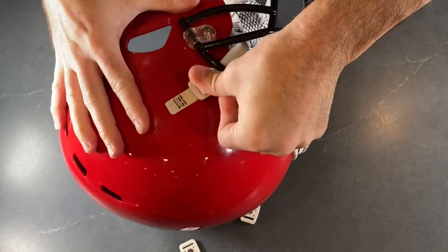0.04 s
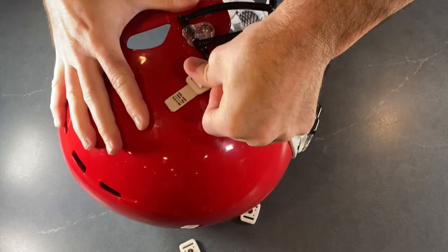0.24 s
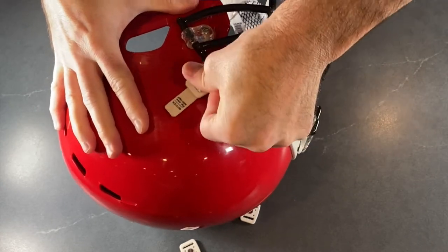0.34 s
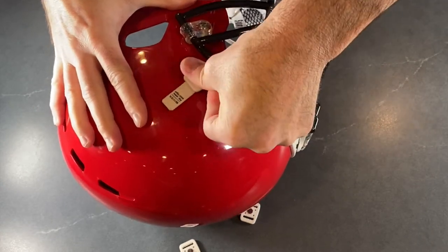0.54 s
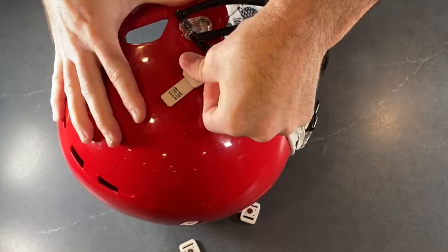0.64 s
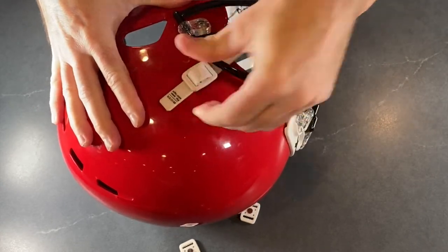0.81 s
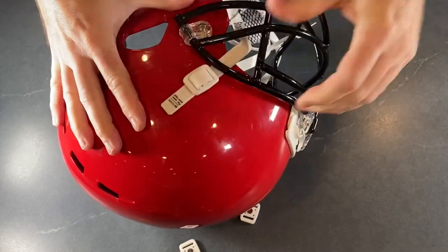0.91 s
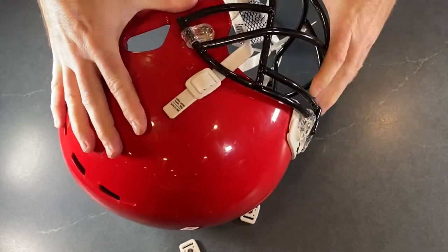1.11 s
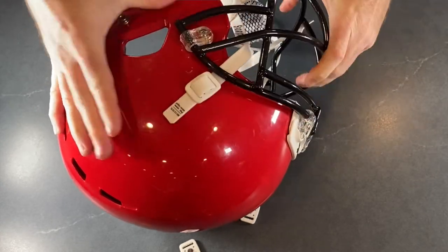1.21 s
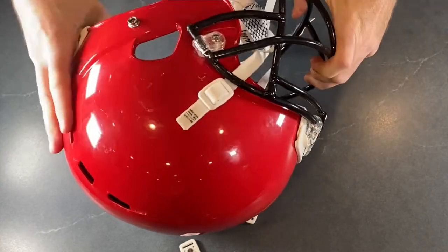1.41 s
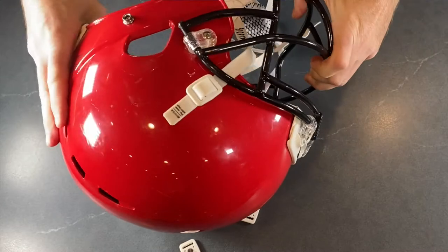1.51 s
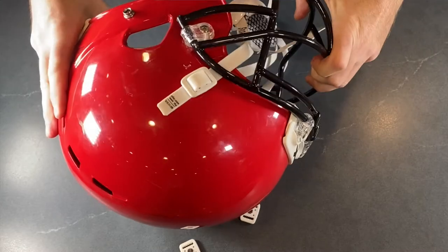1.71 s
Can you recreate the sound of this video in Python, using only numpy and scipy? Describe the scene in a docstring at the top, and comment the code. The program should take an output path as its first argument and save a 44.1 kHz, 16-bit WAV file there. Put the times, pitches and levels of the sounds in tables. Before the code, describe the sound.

A plastic chinstrap buckle snaps sharply onto a helmet, close by in a quiet room. The strap ticks faintly as it is let go, then the helmet knocks softly on a table as it is turned.

```python
"""Snapping a helmet's chinstrap shut

Fingers press a plastic buckle onto its post: a small click, then one sharp snap that rings the helmet's shell
and the room. The strap ticks before and after the snap, skin slides over the glossy shell with a thin gliding
hiss, and the helmet knocks softly on the table as it is turned. A low room rumble lies underneath."""
import sys
import numpy as np
from scipy import signal
from scipy.fft import rfft, irfft
from scipy.io import wavfile

SR = 44100
rng = np.random.default_rng(int(sys.argv[2]) if len(sys.argv) > 2 else 0)


def store_pcm(level_fs):
    """Save levels as 16-bit WAV."""
    pcm = np.round(np.clip(level_fs, -1, 1) * 32767).astype(np.int16)
    wavfile.write(sys.argv[1], SR, np.atleast_2d(pcm).T)


N = 77175
TIME = np.arange(N) / SR

# The buckle's hits, each a rounded push plus a hard click:
# t/s, push level/dB, push centre f/Hz, push width/octaves, click level/dB
SNAP_HITS = [(0.1803, -24, 1000, 2.5, -28.5), (0.1821, -24.5, 1000, 3.5, -33.5),
             (0.1854, -28.5, 1750, 0.87, -39.5), (0.2219, -2.5, 815, 1.81, -1), (0.224, 0, 1020, 0.8, -13),
             (0.2257, 2.47, 1650, 0.35, -13)]
# Tones the shell rings with: f/Hz, level/dB, ring time/s (the time to fade by 60 dB)
SHELL_TONES = [(165.8, -33.5, 0.3), (438.2, -28, 0.09), (626, -41.5, .051), (718, -31, .058),
               (781, -33.5, .045), (853, -36.5, 0.049), (995, -25.5, 0.046), (1073, -26.5, 0.034),
               (1339, -31, 0.022), (1682, -19.5, .017), (1878, -16.5, 0.019), (2256, -36, 0.038),
               (2465, -26.5, 0.027)]
# Tones of the post and its socket: f/Hz, level/dB, ring time/s
POST_TONES = [(4490, -32.5, 0.013), (5070, -30, 0.0036), (5460, -31, 0.015), (8480, -32.5, 0.015),
              (10420, -30, .008), (12400, -34.5, 0.01)]
# Colour (loudness from bass to treble) of the post's crowd of weaker tones: f/Hz, level/dB
POST_COLOUR = [(800, -18), (3200, -19), (5000, 4.5), (6500, -10.5), (8200, -1), (9400, -8.5), (12000, 0),
               (15000, -23)]
def buckle_snap():
    """The buckle catches, jumps over the post and seats, ringing both post and shell."""
    return contacts(SNAP_HITS, SHELL_TONES, POST_TONES, POST_COLOUR, crowd_db=-28.5, spread_db=0)


# Strap and buckle ticks: t/s, push level/dB, push centre f/Hz, push width/octaves, click level/dB
TICK_HITS = [(0.002, -23.5, 1620, 2.3, -27), (0.02, -25.5, 1350, 0.53, -61), (0.029, -26.5, 425, 0.79, -57),
             (0.052, -33, 1410, 0.76, -60), (0.067, -31, 1310, 0.45, -60), (0.0972, -49.5, 1900, 1, -49),
             (0.148, -42.5, 1794, .8, -56.5), (0.534, -43, 1860, 2.53, -37), (0.5549, -35, 1105, 1.1, -54),
             (0.571, -31.5, 431, 0.64, -52), (0.573, -28, 1685, 0.46, -48),
             (0.5794, -32.5, 1790, 0.56, -39), (0.677, -37.5, 430, 1.5, -53), (0.748, -38.5, 993, 2.2, -46),
             (0.792, -29.5, 440, 1.1, -52), (0.8229, -21.5, 1243, 0.32, -47.5)]
def strap_ticks():
    """The strap scuffs rather than strikes, so each push takes a moment to swell."""
    return contacts(TICK_HITS, SHELL_TONES, POST_TONES, POST_COLOUR, rise_s=.002)


# Knocks on the table: t/s, push level/dB, push centre f/Hz, push width/octaves, click level/dB
KNOCK_HITS = [(1.198, -17, 514, 1.3, -35.5), (1.206, -29.5, 920, 1.9, -52), (1.2681, -29, 2030, 3.5, -43),
              (1.321, -30.5, 410, 1.3, -51), (1.347, -37, 1800, 2.6, -40.5), (1.437, -28, 1380, 0.33, -52),
              (1.484, -15, 930, 0.64, -33.5), (1.514, -30.5, 1323, 1.8, -51),
              (1.541, -34.5, 1240, 0.99, -49), (1.61, -29, 343, .8, -59), (1.613, -33, 2200, 1.03, -41.5)]
# Tones of the helmet and face guard against the table: f/Hz, level/dB, ring time/s
GUARD_TONES = [(306, -38.5, 0.36), (418.3, -25.5, 0.087), (460, -35.5, 0.14), (940, -22.5, 0.015),
               (1179, -32, 0.044), (1812, -25.5, 0.023), (2193, -27, 0.037), (3000, -41.5, 0.033)]
# High tones that give the knocks a hard edge: f/Hz, level/dB, ring time/s
EDGE_TONES = [(2990, -21.5, 0.015), (3390, -29, 0.013), (4280, -26, 0.012), (7170, -26.5, .011)]
# Colour of the weaker tones in that edge: f/Hz, level/dB
EDGE_COLOUR = [(800, -26), (3000, 5), (4600, -4), (5700, -3), (7500, -2), (12000, -8), (15000, -20)]
def table_knocks():
    """The helmet and its face guard bump the table as they are turned."""
    return contacts(KNOCK_HITS, GUARD_TONES, EDGE_TONES, EDGE_COLOUR)


# Colour of the weak tones between the shell's main ones: f/Hz, level/dB
SHELL_COLOUR = [(150, -8.5), (250, -9.5), (400, -3.5), (950, 0), (1900, -2), (2800, -11.5), (5000, -31),
                (15000, -65.5)]
def contacts(hits, push_tones, click_tones, click_colour, crowd_db=-21, spread_db=3.5, rise_s=1 / SR):
    """Each hit gives the helmet a rounded push and its fittings a hard click."""
    # The defaults suit light hits, which land anywhere: more of the weak tones, and uneven main ones.
    out = np.zeros(2 * N)
    for start_s, push_db, centre_hz, octaves, click_db in hits:
        edge_ratio = 2 ** (max(octaves, .1) / 2)
        edges_hz = [centre_hz / edge_ratio, min(centre_hz * edge_ratio, SR / 3)]
        band = signal.butter(1, edges_hz, "band", fs=SR, output="sos")
        ring = struck_part(push_tones, spread_db, SHELL_COLOUR, crowd_db, crowd_fade_s=.04)
        swell = 1 - np.exp(-TIME[:len(ring)] / rise_s)
        push = signal.sosfilt(band, ring) * swell
        click = struck_part(click_tones, spread_db, click_colour, crowd_db=-28.5, crowd_fade_s=.024)
        start = int(start_s * SR)
        out[start:start + len(push)] += from_db(push_db) * push + from_db(click_db) * click
    return out[:N]


def struck_part(tones, spread_db, crowd_colour, crowd_db, crowd_fade_s, size=16384):
    """A struck part rings with its main tones and a fast-dying crowd of weak ones, new for every hit."""
    ring = np.zeros(size)
    for hz, db, ring_s in tones:
        strength = from_db(db + spread_db * rng.standard_normal())
        ring += strength * decay(ring_s, size) * np.sin(2 * np.pi * hz * TIME[:size])
    return ring + from_db(crowd_db) * weak_tones(crowd_colour, crowd_fade_s, size)


def weak_tones(colour, fade_s, size):
    """Many weak tones blur into one short burst with no gaps between their pitches."""
    envelope = decay(fade_s, size)
    phases = np.angle(rfft(envelope * rng.standard_normal(size)))
    even = irfft(np.exp(1j * phases), size)  # every frequency equally strong
    burst = tint(even, colour) * decay(4 * fade_s, size)  # a slower second fade quiets the tail
    return burst * np.linalg.norm(envelope) / np.linalg.norm(burst)


# Path of the sliding skin's whistle: t/s, f/Hz, level/dB
SLIDE_PATH = [(0.34, 8200, -99), (0.375, 9450, -81), (0.41, 11520, -69.5), (0.47, 9900, -81.5),
              (0.53, 7850, -98), (0.62, 7450, -105), (0.69, 8300, -89), (0.735, 7060, -90.5),
              (0.79, 9200, -85.5), (0.845, 10850, -77.5), (0.9, 8130, -91.5), (0.99, 10100, -82.5),
              (1.075, 14150, -78), (1.125, 10380, -81.5), (1.18, 12600, -78.5), (1.3, 13200, -82.5),
              (1.5, 13400, -94)]
def skin_slide():
    """Skin on the glossy shell makes a thin, hissy whistle whose pitch follows the sliding speed."""
    hz, level_db = in_time(SLIDE_PATH)
    whistle = gliding_band(hz, width_hz=460)
    hiss = gliding_band(hz + 270, width_hz=950)  # wider, and just above the whistle
    return from_db(level_db) * (whistle + from_db(-4) * hiss)


def gliding_band(hz, width_hz):
    """A narrow band of noise whose centre follows a pitch curve."""
    smoothing = signal.butter(2, width_hz / 2, fs=SR, output="sos")
    wander = signal.sosfilt(smoothing, rng.standard_normal((2, N)))
    phase = 2 * np.pi * np.cumsum(hz) / SR
    return (wander[0] * np.cos(phase) + wander[1] * np.sin(phase)) / wander.std()


# Loudness of the brushing: t/s, level/dB
BRUSH_LEVELS = [(0, -101.5), (0.6, -90.5), (0.8, -82.5), (1.0, -82), (1.07, -73), (1.13, -79), (1.3, -73.5),
                (1.52, -67.5), (1.75, -75.5)]
# Its colour: f/Hz, level/dB
BRUSH_HISS = [(1500, 4), (4000, -5), (5600, -8), (7200, 3), (9200, -2.5), (11500, -2), (13500, -2),
              (15000, -11.5)]
def hand_brush():
    """Hands brush the helmet with a broad hiss."""
    return from_db(in_time(BRUSH_LEVELS)[0]) * noise(BRUSH_HISS)


# Loudness of the rubbing: t/s, level/dB
RUB_LEVELS = [(0.62, -100), (0.71, -78.5), (0.9, -73.5), (1.0, -74.5), (1.08, -101.5), (1.75, -92)]
# Its colour: f/Hz, level/dB
RUB_HISS = [(1000, -17), (1900, 4), (2350, 4.5), (3300, -4.5), (4200, -16), (11500, -30), (12100, -3),
            (12700, -26.5)]
def finger_rub():
    """Fingers leave the strap with a duller rub."""
    return from_db(in_time(RUB_LEVELS)[0]) * noise(RUB_HISS)


# Colour of the snap on its way to the walls: f/Hz, level/dB
SPILL_COLOUR = [(130, -16), (260, -9), (420, -1.5), (900, 1), (1900, 0.5), (2800, -16), (5000, -16),
                (8300, -15), (12500, -20.5), (15000, -31.5)]
def snap_spill():
    """The snap leaves the curved shell in all directions, so the walls get clicks of smoother colour."""
    clicks = np.zeros(N)
    for start_s, *_, click_db in SNAP_HITS:
        clicks[int(start_s * SR)] += from_db(click_db + 14.5)
    return tint(clicks, SPILL_COLOUR)


# Colour of the room's echo: f/Hz, level/dB
ECHO_COLOUR = [(120, 11.5), (450, 2.5), (1000, 2), (1800, -1.5), (3200, 2), (8000, 0), (14000, -3.5)]
def room_echo(sound):
    """The walls return a blurred echo a moment later; its treble dies slightly sooner."""
    bass_ring_s, treble_ring_s, split_hz, delay_s = .33, .32, 2300, .0051
    tail = tint(rng.standard_normal(N), ECHO_COLOUR)
    bass = signal.sosfilt(signal.butter(1, split_hz, fs=SR, output="sos"), tail)
    treble = tail - bass
    echo = (bass * decay(bass_ring_s) + treble * decay(treble_ring_s)) * (TIME > delay_s)
    echo /= np.linalg.norm(decay(bass_ring_s))
    return from_db(-15) * signal.fftconvolve(sound, echo)[:N]


# Colour of the room's rumble: f/Hz, level/dB
RUMBLE_COLOUR = [(10, -2.5), (30, 1.5), (50, -9.5), (80, -15.5), (130, -22), (230, -30.5), (600, -57.5),
                 (2000, -83.5)]
# Colour of its faint hiss: f/Hz, level/dB
AIR_COLOUR = [(100, 4), (400, 8), (1000, -4), (2000, -4.5), (3200, -17.5), (7000, -14.5), (13000, -22),
              (15000, -35.5)]
def room_background():
    """A steady deep hum stands out of a low rumble and a faint hiss."""
    hum_hz = 30.4
    hum = from_db(-49.5) * np.sin(2 * np.pi * hum_hz * TIME)
    return hum + from_db(-53) * noise(RUMBLE_COLOUR) + from_db(-73.5) * noise(AIR_COLOUR)


def from_db(db):
    """Turn decibels into a number to multiply by."""
    return 10 ** (np.asarray(db) / 20)


def in_time(rows):
    """Join a table's points with straight lines: one curve for each column after the time."""
    times, *columns = np.transpose(rows)
    return [np.interp(TIME, times, column) for column in columns]


def tint(sound, colour):
    """Turn each frequency up or down as a colour table says."""
    hz, db = np.transpose(colour)
    bins_hz = np.maximum(np.fft.rfftfreq(len(sound), 1 / SR), 1)
    gains = from_db(np.interp(np.log(bins_hz), np.log(hz), db))
    return irfft(rfft(sound) * gains, len(sound))


def noise(colour):
    """Coloured noise with a typical size (rms) of 1."""
    hiss = tint(rng.standard_normal(N), colour)
    return hiss / hiss.std()


def decay(ring_s, size=N):
    """A fade that loses 60 dB in ring_s seconds."""
    return np.exp(-np.log(1000) * TIME[:size] / ring_s)


def scene():
    """Helmet and hands in a quiet room, heard directly and off the walls."""
    snap = buckle_snap()
    handling = strap_ticks() + table_knocks()
    skin = skin_slide() + hand_brush() + finger_rub()
    background = room_background()
    to_walls = snap_spill() + from_db(-7) * snap + handling + from_db(1.5) * skin
    return (snap + handling + skin + room_echo(to_walls) + background)[None]


def record(dry):
    """The very highest treble is cut off steeply."""
    cutoff_hz = 15200
    return signal.sosfilt(signal.ellip(10, .2, 70, cutoff_hz, fs=SR, output="sos"), dry)


dry = scene()
out = record(dry)
store_pcm(out)
```